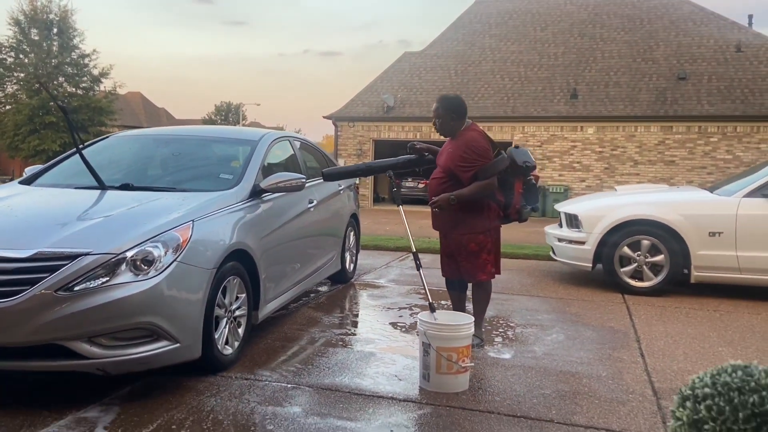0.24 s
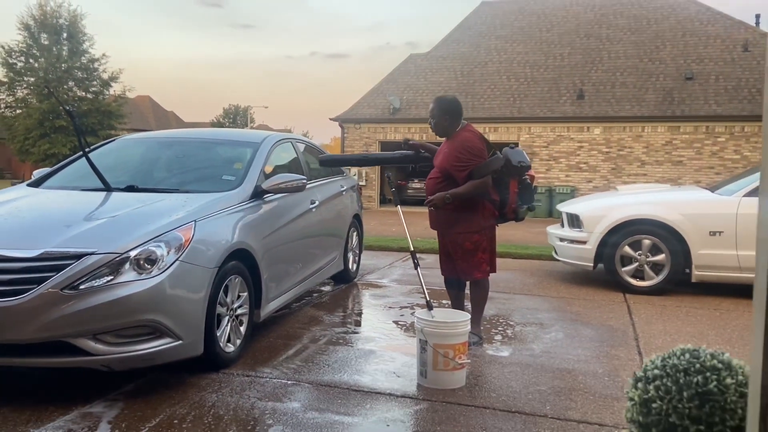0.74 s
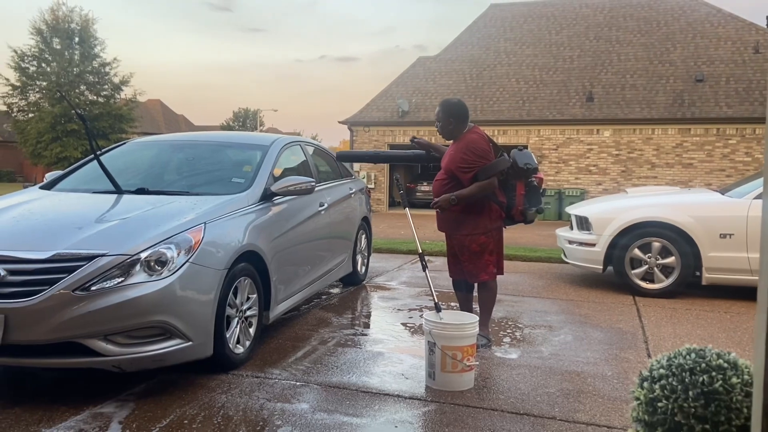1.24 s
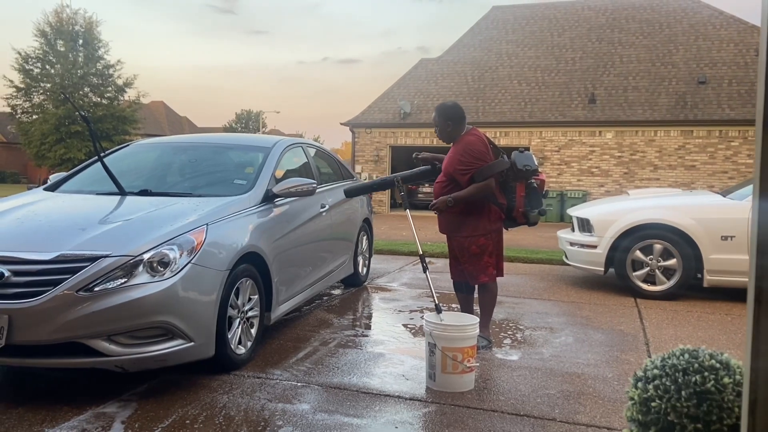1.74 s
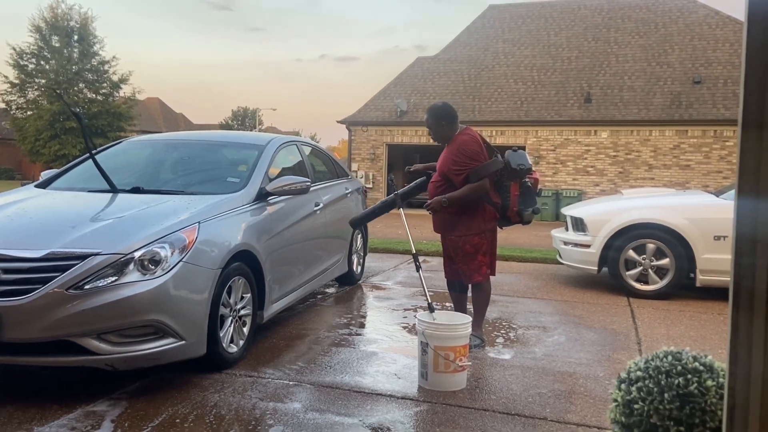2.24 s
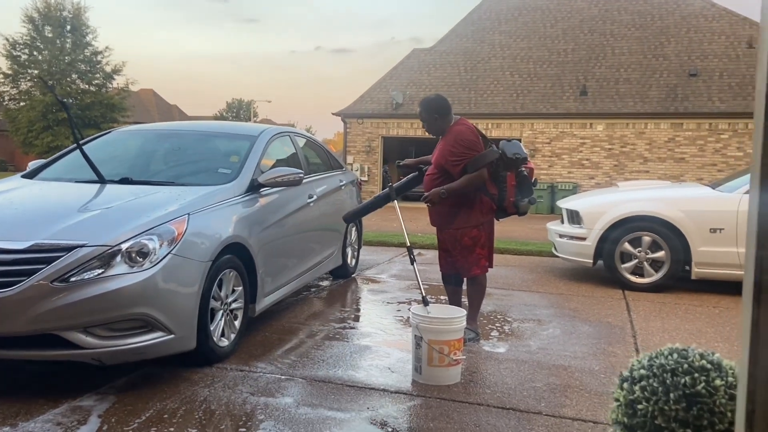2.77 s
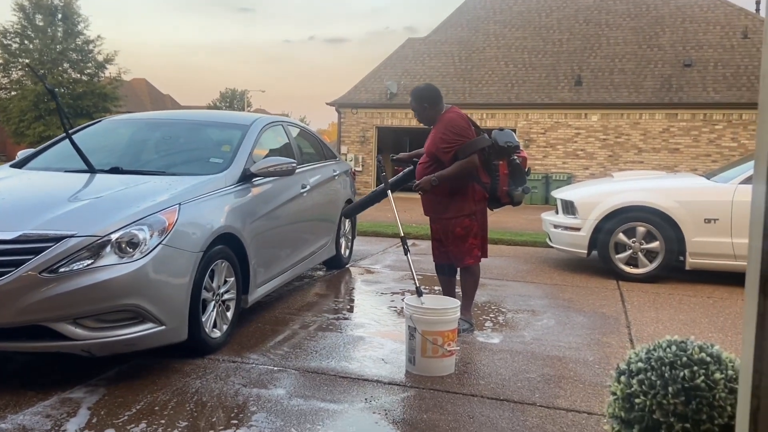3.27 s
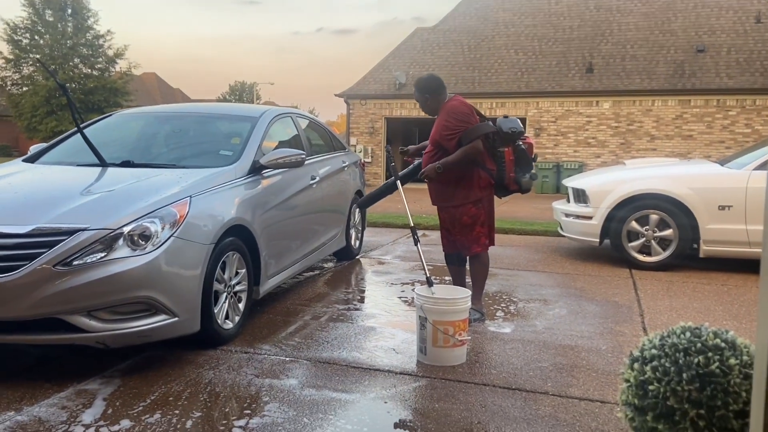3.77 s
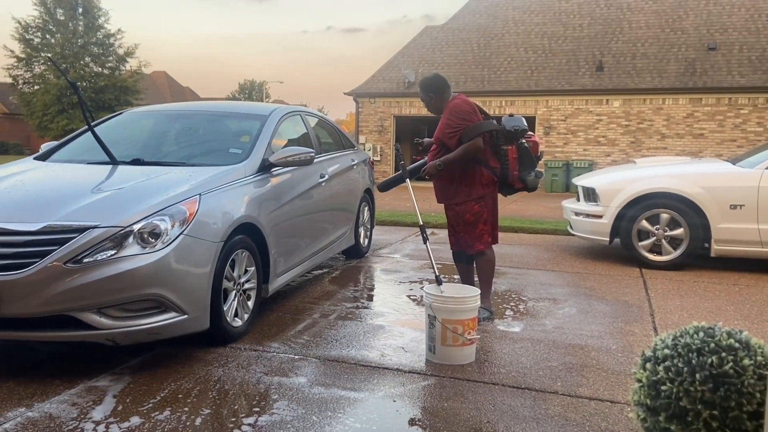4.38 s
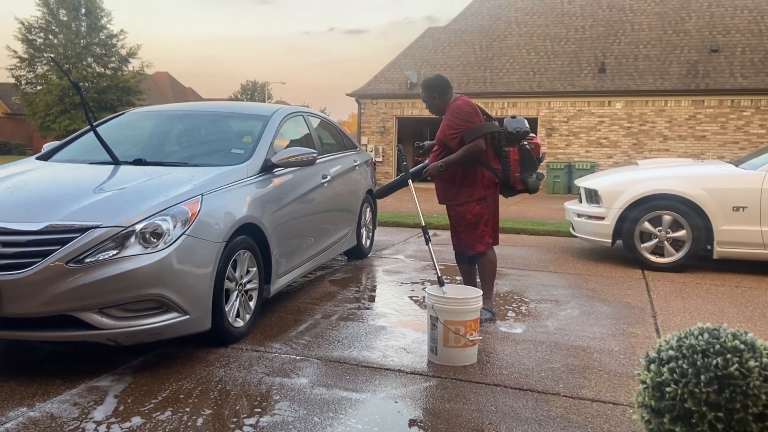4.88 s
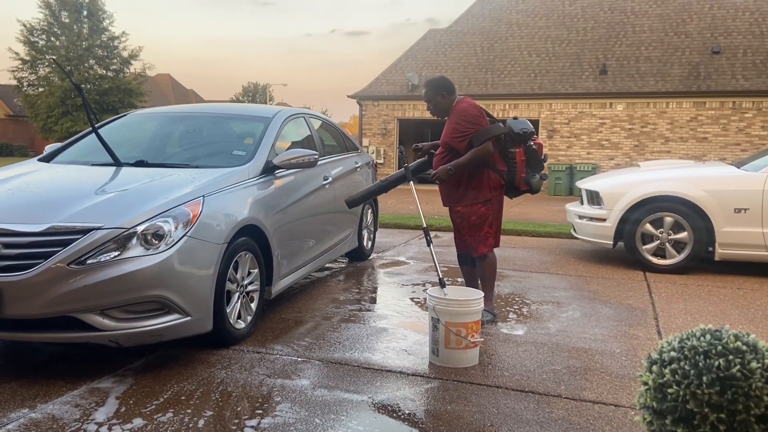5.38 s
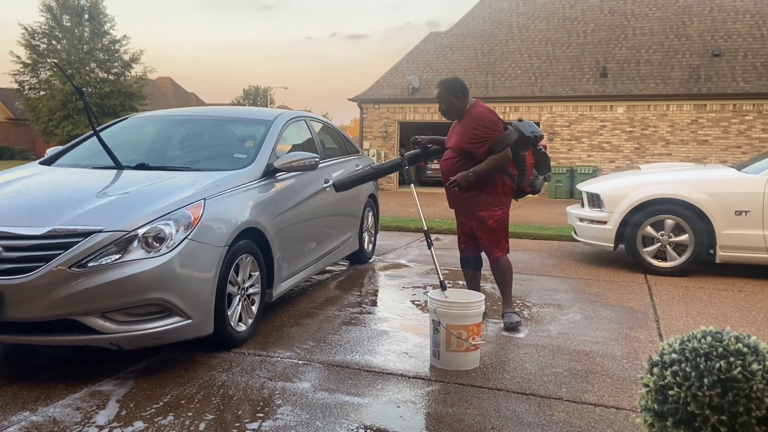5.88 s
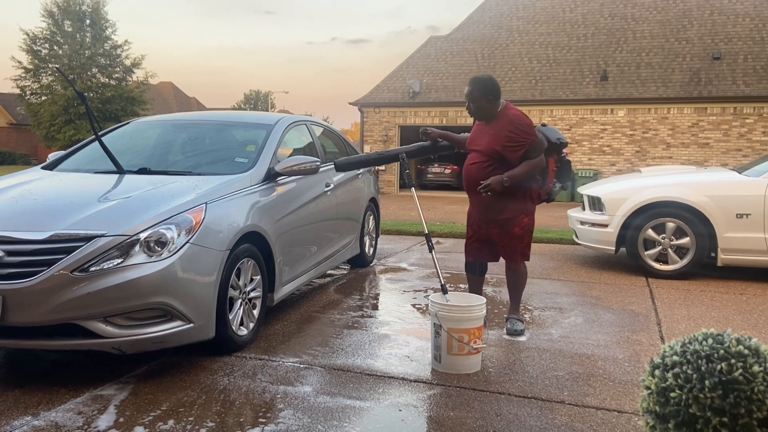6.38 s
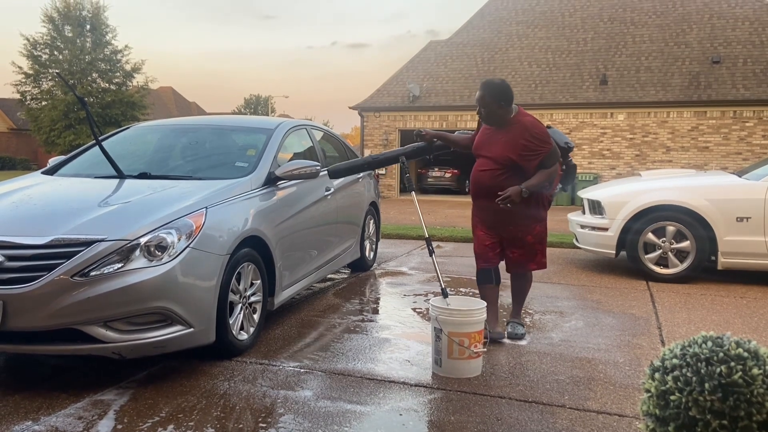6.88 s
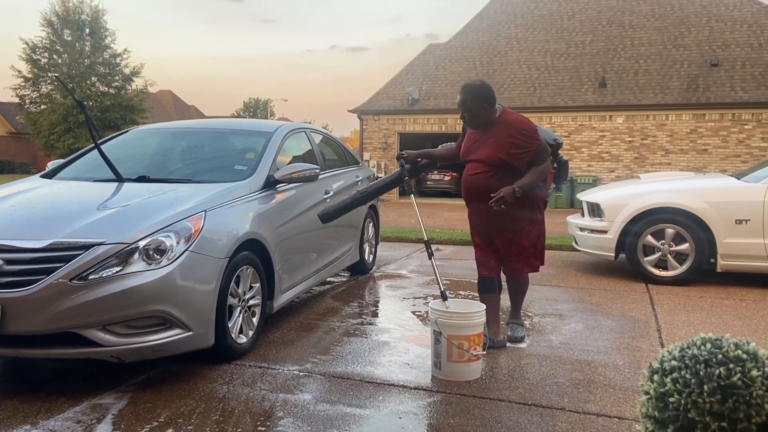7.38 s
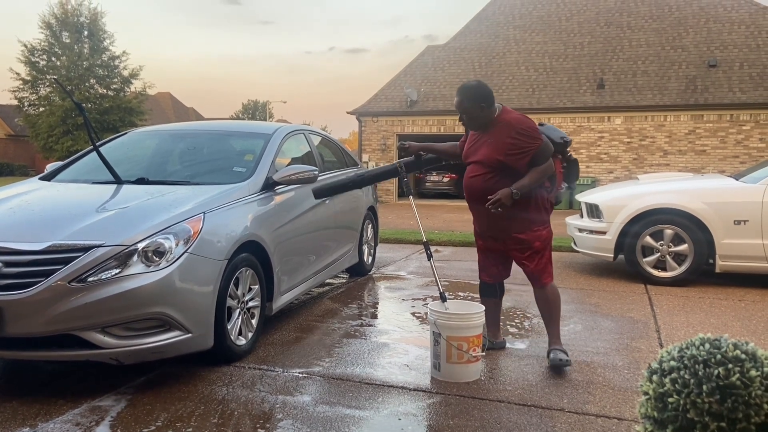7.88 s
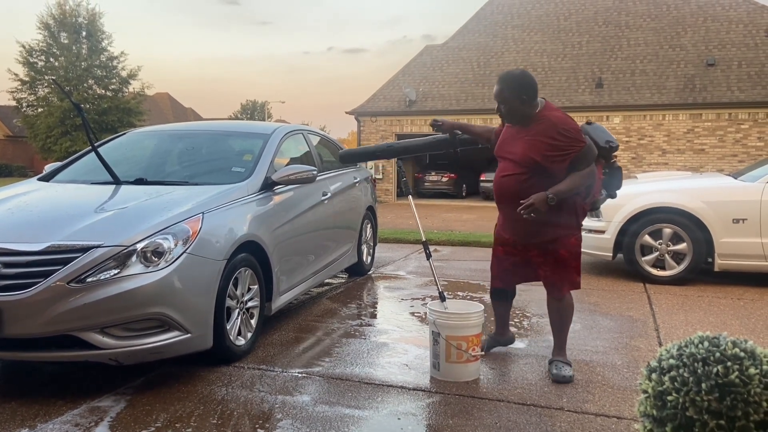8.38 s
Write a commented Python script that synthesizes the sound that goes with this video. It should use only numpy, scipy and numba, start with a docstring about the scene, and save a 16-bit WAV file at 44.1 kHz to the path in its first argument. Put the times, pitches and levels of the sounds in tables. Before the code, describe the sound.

A petrol backpack leaf blower drones at steady full throttle outdoors, its air jet hissing and roaring over a car's bodywork, with brief breathy hums.

```python
"""On a paved drive, a two-stroke backpack blower at full throttle dries a car, a few metres from a phone.
Engine firings give a comb of steady tones, made as multiples of the crank angle, that shift as the wearer turns.
Jet, fan and exhaust gas hiss: noise split into bands that flicker alone. Where the jet meets the bodywork, noise
in broad resonances roars, drums, booms and rumbles. A door edge sings a breathy note in a narrow resonance,
and wavering sine tones hum in the blower tube."""
import sys
import numpy as np
from scipy import signal
from scipy.fft import rfft, irfft, next_fast_len
from scipy.io import wavfile
from scipy.ndimage import uniform_filter1d
from numba import njit

SR = 44100
rng = np.random.default_rng(int(sys.argv[2]) if len(sys.argv) > 2 else 0)


def wav_out(sig):
    """Save sig, one row per channel (or a flat mono array), as 16-bit PCM at SR to the path in sys.argv[1]."""
    wavfile.write(sys.argv[1], SR, np.round(np.clip(np.atleast_2d(sig).T, -1, 1) * 32767).astype(np.int16))


def field_ratio(decibels):
    """Amplitude ratio for a level in dB (20 dB per decade); scalars and array-likes work."""
    return 10 ** (np.asarray(decibels, dtype=float) / 20)


N = 380580  # length [samples]
STEP = 256  # spacing of slowly changing controls [samples]

# low thuds of gusts: (start [s], end [s], level [dB])
GUSTS = [(1.28, 1.36, -46), (3.48, 3.56, -44), (4.3, 4.45, -49), (4.85, 4.95, -46), (5.9, 6.42, -47),
         (6.6, 6.7, -49)]
# the jet sweeps across the bodywork: (start [s], end [s], roar [dB], drumming [dB], boom [dB])
JET_SWEEPS = [(-.1, .62, -24.5, -33, -33.5), (.22, .56, -28.5, -29, -40), (1.55, 1.7, -34, -52, -44),
              (2.5, 2.8, -44, -45, -34), (2.95, 3.55, -38, -30.5, -31), (4.3, 4.5, -47, -47, -37.5),
              (5.1, 5.3, -35, -34, -41), (5.5, 5.65, -35, -50, -36), (5.95, 6.35, -32, -50, -29),
              (6.7, 7.0, -41, -50, -33.5), (7.2, 7.85, -43, -33.5, -23.5), (8.12, 8.35, -29, -50, -34.5)]
# note of the jet on a door edge: (time [s], pitch [Hz], level [dB])
EDGE_NOTE = [(1.3, 248, -59), (1.55, 289, -43), (1.9, 316.6, -30.5), (2.15, 332, -39), (2.4, 349, -51),
             (3.5, 329, -54), (3.7, 324.4, -33.5), (4.05, 345.6, -34), (4.2, 320, -38), (4.4, 306.5, -36),
             (4.7, 320, -49), (4.9, 325, -60)]
# standing waves in the blower tube: (frequency [Hz], width [Hz], relative level [dB], left minus right [dB])
TUBE_WAVES = [(101.63, 1.72, 2, 4), (208, 2.43, -1, 2), (314.6, 3.75, -6.5, -11), (416, 4.2, -14, -6)]
# times when the tube hum catches: (start [s], end [s], level [dB])
HUM_CATCHES = [(.25, .4, -56), (1.33, 1.55, -43), (2.2, 3.6, -47), (3.85, 4.2, -41), (4.35, 4.68, -40),
               (5.1, 5.22, -43), (5.45, 5.75, -46), (6.62, 6.75, -41)]
# colour of the hiss of jet, fan and exhaust gas: (frequency [Hz], relative level per Hz [dB])
HISS_COLOUR = [(30, -56), (62, -15.5), (400, -10), (850, -6), (1100, -9.5), (1450, -2), (1750, -9.5),
               (2100, -6), (2580, -11.5), (2900, -10), (4300, -18.5), (7500, -20.5), (10000, -25.5),
               (16000, -33)]
# likeness of the hiss left and right: (frequency [Hz], correlation, left minus right [dB])
HISS_LIKENESS = [(50, 0.83, 0), (196, 1, 19), (396, -0.76, -1.5), (800, 0.97, 3.5), (1610, 0.22, -1),
                 (3460, 0.49, 1.5), (5600, 0.009, 3.6), (7340, 0.81, -2.5), (8140, -0.18, 3), (8450, -1, 0),
                 (9550, -1, 0), (10000, 0.35, -1), (11500, 0.58, 0), (12300, .2, 0), (12650, -.98, 0),
                 (13600, -.98, 0), (14500, .95, 3)]
# level of the hiss: (time [s], level [dB])
HISS_COURSE = [(0, -30), (.8, -33), (2, -33), (3.8, -32), (5.2, -32.5), (7.2, -32.5), (8.63, -32.5)]
# the wearer turns to face the phone: (time [s], share of the turn 0-1, change of high tones by the body [dB])
WEARER_TURN = [(0, 0.25, 6), (.8, 0.05, -0.5), (5.2, 0.01, 4), (5.7, 0.24, -0.5), (6.0, 0.25, -3),
               (6.4, 0.3, 0), (6.7, 0.54, -6), (7.05, 0.9, -6), (7.45, 0.9, -6), (7.8, 1, -2),
               (8.15, 1, -2.5), (8.63, 0.88, -2)]
# engine speed, and the muffler's main note as the wearer leans: (time [s], firing rate [Hz], order 2 level [dB])
ENGINE_COURSE = [(0, 119.6, -21), (.2, 119.57, -20.5), (.56, 119.22, -24), (2.0, 119.09, -23),
                 (2.3, 119.55, -22), (2.72, 119.41, -22), (3.4, 119.08, -25.5), (3.8, 119.46, -23.5),
                 (4.2, 119.19, -26.5), (5.24, 119.2, -27), (5.7, 119.68, -26.5), (6.32, 119.5, -26.5),
                 (7.04, 119.17, -25.5), (7.6, 119.35, -22.5), (8.1, 119.85, -21.5), (8.63, 119.55, -23.5)]
# low engine tones, a side path giving way to a front path: (order, side [dB], front [dB],
# polarity of the front path, share of the lean followed [dB per dB])
LOW_TONES = [(1, -30, -28, 1, 0.047), (5, -30.5, -44, -1, 0.12), (6, -36, -27.5, -1, -1.1),
             (7, -25.5, -32.5, -1, 0.9), (8, -31, -36, 1, -0.57)]
# weaker exhaust and fan tones: (multiple of the firing rate, level before shading [dB])
WEAK_TONES = [(3, -39), (4, -41), (9, -53), (10, -45), (11, -39.5), (13, -42), (14, -44), (15, -49),
              (16, -53), (17, -52), (18, -50), (19, -60), (20, -57), (21, -57), (22, -54), (23, -66),
              (24, -50), (25, -57), (26, -49), (27, -49), (28, -48), (30, -57), (31, -58), (32, -54),
              (34, -56), (35, -61), (36, -63), (37, -59), (38, -66), (39, -67), (40, -64), (41, -59),
              (42, -59), (43, -61), (45, -60), (46, -66)]
# high whines of fan and exhaust: (order, level before shading [dB], share of the shading)
HIGH_WHINES = [(12, -41.5, 0.27), (29, -48.5, 1.24), (33, -51, 0.64), (44, -55, .7)]
# an order swells or dips as an echo lines up with it: (middle [s], length [s], order, rise [dB])
ECHO_SWELLS = [(0.33, 0.7, 5, 8), (3.26, .7, 5, 4), (3.8, 0.45, 6, 4.5), (6.4, 0.74, 8, -5.5),
               (4.7, 0.93, 11, 3.5), (1.8, 1.7, 14, 7), (6.4, 2.1, 14, 7), (7.9, 1.6, 17, 15.5),
               (0.33, 0.81, 12, 12), (1.77, 0.84, 12, 9.5), (2.6, 0.96, 12, 4), (3.796, 0.27, 12, 11.5),
               (5.06, 1.8, 12, 7.5), (6.7, .4, 12, 8.5), (8.23, 0.56, 12, 10.5), (1.3, 1.7, 29, 7),
               (3, 0.43, 29, 5), (5.05, 0.51, 29, 2), (1.64, 0.36, 33, 6), (2.72, 0.45, 33, 6),
               (5.24, .4, 33, 6), (1.8, 0.33, 44, 8), (3.8, 0.8, 44, 11.5), (4.7, 1.1, 44, 10)]
# how the orders fall on the two microphone ports: (order, left minus right [dB], left lead [rad])
PORT_BALANCE = [(1, 0.0, 0.44), (2, 3.5, -0.1), (3, -2.6, -0.64), (4, -2.5, 1.29), (5, 7.3, -0.34),
                (6, 0.8, -0.04), (7, 2.1, 0.15), (8, 1.4, -0.03), (9, -1.6, -0.62), (13, 4.1, 1.07),
                (14, 1.5, 2.14), (15, -0.4, -2.36), (17, 0, 0.2), (36, 0, 0.2), (44, 2, -2.5)]


def level(x):
    """Scale to unit rms."""
    return x / np.sqrt(np.mean(x ** 2))


def columns(table, s):
    """Read the curves of a table at times s."""
    t, *curves = np.transpose(table)
    return [np.interp(s, t, curve) for curve in curves]


def walk(rate, size=N, step=1):
    """Random levels held for 1 / rate seconds and smoothed twice; spread near 1."""
    hold = max(int(SR / step / rate), 1)
    held = rng.standard_normal(int(N / SR * 200))[np.arange(size) // hold]
    return 1.37 * uniform_filter1d(uniform_filter1d(held, hold), hold)


def pan(x, db):
    """Left and right of a sound that is db louder on the left."""
    return x * field_ratio(np.array([[db], [-db]]) / 2)


def bursts(table, rest_db, ramp_s):
    """Gains of a steady rest plus events that ramp up, hold and ramp down; one row for each level column."""
    t = np.arange(N // STEP + 2) * STEP / SR
    power = field_ratio(rest_db)[:, None] ** 2
    for start, end, *db in table:
        shape = np.clip(np.minimum(t - start, end - t) / ramp_s + .5, 0, 1)
        power = power + (field_ratio(db)[:, None] * shape) ** 2
    return [np.interp(np.arange(N) / SR, t, gain) for gain in np.sqrt(power)]


@njit
def svf(x, hz, width):
    """State-variable band-pass: two linked integrators ring at a moving centre, with gain 1 there."""
    y, band, low = np.empty(len(x)), 0., 0.
    for i in range(len(x)):
        g, damping = np.tan(np.pi * hz[i] / SR), width / hz[i]
        v = (band + g * (x[i] - low)) / (1 + g * (g + damping))
        band, low, y[i] = 2 * v - band, low + 2 * g * v, damping * v
    return y


def buffet(hz, width, like, flutter_db):
    """Turbulent noise in one resonance, partly shared by the ports, in uneven bursts."""
    def resonance():
        """One noise, filtered twice."""
        noise = rng.standard_normal(N)
        return level(svf(svf(noise, hz, width), hz, width))
    mid, side = resonance(), resonance()
    side = np.sqrt((1 - like) / (1 + like)) * side
    return field_ratio(flutter_db * walk(18)) * (mid + side * np.array([[1], [-1]]))


def rumble(faced):
    """Low air noise with gust thuds, louder once the nozzle points nearer the phone."""
    gain = bursts(GUSTS, [-56.5], ramp_s=.05)[0]
    return buffet(np.full(N, 66.), 34.0, 0.81, 1.5) * gain * field_ratio(3.5 * faced)


def boom(gain):
    """Air resonates in door gaps and wheel arches."""
    return buffet(np.full(N, 285.), 164.0, 0.83, 2.6) * gain


def drum(gain):
    """The jet makes the doors drum."""
    return buffet(np.full(N, 430.), 196.0, 0.65, 1.5) * gain


def roar(gain, faced):
    """The jet breaks up on flat panels, louder once the nozzle points nearer the phone."""
    noise = buffet(np.full(N, 730.), 590.0, 0.41, 0.99)
    return pan(noise * gain * field_ratio(2.5 * faced), 2.4)


def edge_tone():
    """The jet splits on a door edge and sings a breathy note that follows the nozzle distance."""
    hz, db = columns(EDGE_NOTE, np.arange(N) / SR)
    return buffet(hz, 9.1, 0.84, 1.) * field_ratio(db)


def tube():
    """Turbulence rings the air column of the tube; the lowest wave is a near-steady note."""
    out = 0
    for hz, width, db, pan_db in TUBE_WAVES:
        # a wider resonance wavers more in pitch and in level
        cycles = np.cumsum(hz + width * walk(7.7)) / SR
        gain = np.sqrt(2) * field_ratio(db + width / 2 * walk(6.4))
        out = out + pan(gain * np.sin(2 * np.pi * cycles), pan_db)
    return out * bursts(HUM_CATCHES, [-53], ramp_s=.1)[0]


def hiss(turn, faced):
    """Turbulent noise in bands that drift and flicker alone; the upper ones puff more, once a firing."""
    size = next_fast_len(N)
    f = np.maximum(np.arange(size // 2 + 1) * SR / size, 1)
    log_f = np.log(f)
    hz, db = np.transpose(HISS_COLOUR)
    colour = field_ratio(np.interp(log_f, np.log(hz), db))
    like_hz, like, pan_db = np.transpose(HISS_LIKENESS)
    like = np.interp(log_f, np.log(like_hz), np.clip(like, -1, 1))
    pan_db = np.interp(log_f, np.log(like_hz), pan_db)

    # a shared and an opposed noise, mixed to the wanted likeness
    mid, side = rfft(rng.standard_normal((2, size))) * np.sqrt([1 + like, 1 - like])
    pair = np.array([(mid + side) * field_ratio(pan_db / 2), (mid - side) * field_ratio(-pan_db / 2)]) * colour
    # the jet is nearer the left port: sound arrives there up to 70 microseconds early, less so in the treble
    lead_s = 7e-5 * np.exp(-(f / 3900.0) ** 2)
    pair[0] *= np.exp(2j * np.pi * f * lead_s)

    out = 0
    puff = np.cos(2 * np.pi * (turn - .12))
    for centre in 22 * 2 ** np.arange(0, 10, .5):  # half-octave steps [Hz]
        octaves = (log_f - np.log(centre)) / np.log(2)
        share = np.cos(np.pi / 2 * np.clip(octaves * 2, -1, 1)) ** 2
        band = irfft(pair * share, size)[:, :N]
        flicker_db = 0.97 * walk(1.1) + 0.9 * walk(4.4) + .5 * walk(25)
        # the treble dulls once the wearer's body hides the fan
        treble_db = min(centre / 7000.0, 1) * (0.73 * puff - 2.5 * faced)
        out = out + band * field_ratio(flicker_db + treble_db)
    # scale by the strength between 1.8 and 8 kHz
    band_pass = signal.butter(4, [1800, 8000], "band", fs=SR, output="sos")
    return out / np.std(signal.sosfilt(band_pass, out.mean(0)))


@njit
def harmonics(turn, gain, step):
    """Multiples of the crank angle, each with a slowly moving complex gain for each port."""
    out = np.zeros((2, len(turn)))
    for i in range(len(turn)):
        j, a = i // step, (i % step) / step
        z = np.exp(2j * np.pi * turn[i])
        zk = z
        for k in range(gain.shape[2]):
            for c in range(2):
                out[c, i] += (zk * (gain[c, j, k] * (1 - a) + gain[c, j + 1, k] * a)).real
            zk *= z
    return out


def order_gains(order, s):
    """Strength of each order (multiple of the firing rate) as the wearer leans and turns and echoes line up."""
    main_db = columns(ENGINE_COURSE, s)[1]
    faced, shade_db = columns(WEARER_TURN, s)
    faced = np.clip(faced, 0, 1)
    # the weak orders fade together when the wearer's body hides the engine
    weak, weak_db = np.transpose(WEAK_TONES)
    gain = field_ratio(np.interp(order, weak, weak_db) + 0.36 * shade_db[:, None])
    gain[:, 1] = field_ratio(main_db)
    for k, side_db, front_db, sign, lean in LOW_TONES:
        side_path = (1 - faced) * field_ratio(side_db + lean * (main_db + 24))  # the lean counts from -24 dB
        front_path = np.sign(sign) * faced * field_ratio(front_db)
        gain[:, round(k) - 1] = side_path + front_path
    for k, db, share in HIGH_WHINES:
        gain[:, round(k) - 1] = field_ratio(db + share * shade_db)
    for middle, length, k, rise_db in ECHO_SWELLS:
        gain[:, round(k) - 1] *= field_ratio(rise_db * np.exp(-(2 * (s - middle) / length) ** 2))
    return gain


def crank_turns():
    """Crank angle in turns, one per firing; combustion varies from cycle to cycle, so it jitters."""
    hz = columns(ENGINE_COURSE, np.arange(N) / SR)[0]
    return np.cumsum(hz) / SR + 0.003 * walk(25) + 0.00033 * walk(120)


def engine(turn):
    """Each firing is a blow, heard as a comb of tones; echoes make each order wander."""
    s = np.arange(N // STEP + 2) * STEP / SR
    order = np.arange(1, np.transpose(WEAK_TONES)[0].max() + 1)
    # short waves feel every move of the wearer, long waves hardly
    loose = np.clip(order / 13.0, 0, 1)

    def wander(rate):
        """One slow random course for each order."""
        return loose * np.transpose([walk(rate, size=len(s), step=STEP) for _ in order])

    gain = order_gains(order, s) * field_ratio(2.2 * wander(9.))
    # the muffler spreads the blow: higher orders come a little later
    phase = 0.75 * wander(1.493) + 0.45 * loose * wander(14.) - 0.02983 * order ** 2
    common = np.sqrt(2) * gain * np.exp(1j * phase)
    common[:, :2] *= np.exp(1j * np.array([1.2, 2.4]))

    # half the left-right difference: real part for level, imaginary part for phase
    k, pan_db, lead = np.transpose(PORT_BALANCE)
    side = np.interp(order, k, pan_db) * np.log(10) / 40 + .5j * np.interp(order, k, lead)
    side = side + loose ** 2 * (0.38 * wander(1.24) + .35j * wander(1.1))
    ports = np.array([common * np.exp(side), common * np.exp(-side)])
    return harmonics(turn, ports, STEP)


def scene():
    """Air on the car, the edge note, the tube and the hiss, under the engine tones."""
    t = np.arange(N) / SR
    turn = crank_turns()
    faced = columns(WEARER_TURN, t)[0]
    hiss_db = columns(HISS_COURSE, t)[0]
    # steady roar, drumming and boom [dB], raised by each sweep of the jet
    roar_gain, drum_gain, boom_gain = bursts(JET_SWEEPS, [-31, -39.5, -39.5], ramp_s=0.23)
    car = rumble(faced) + boom(boom_gain) + drum(drum_gain) + roar(roar_gain, faced)
    air = car + edge_tone() + tube() + hiss(turn, faced) * field_ratio(hiss_db)
    return air + engine(turn)


def top_cut(x):
    """Nothing passes above the cut-off."""
    return signal.sosfilt(signal.butter(12, 16720, fs=SR, output="sos"), x)


def record(dry):
    """The phone cuts the top of the sound with a steep low-pass at 15.9 kHz."""
    low_pass = signal.ellip(8, .2, 70, 15900, fs=SR, output="sos")
    mix = signal.sosfilt(low_pass, dry)
    return top_cut(mix)


dry = scene()
out = record(dry)
wav_out(out)
```